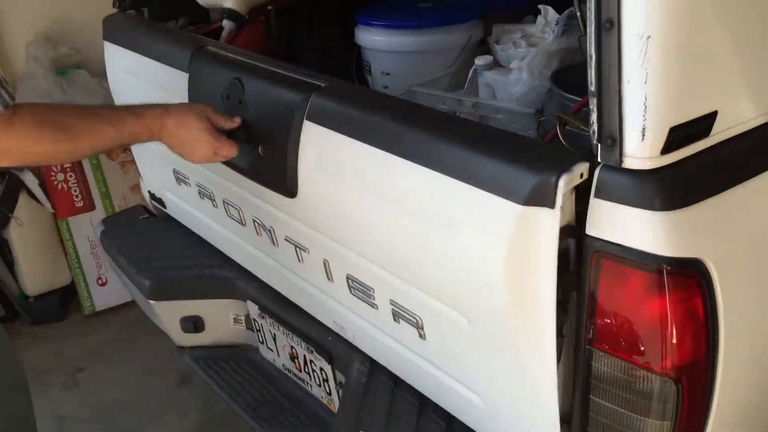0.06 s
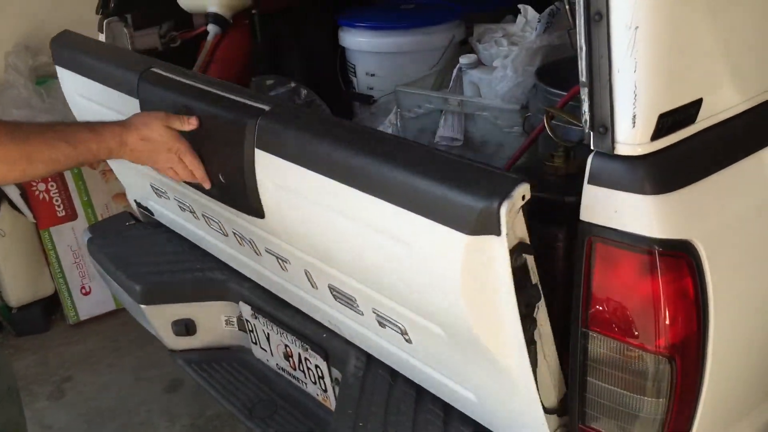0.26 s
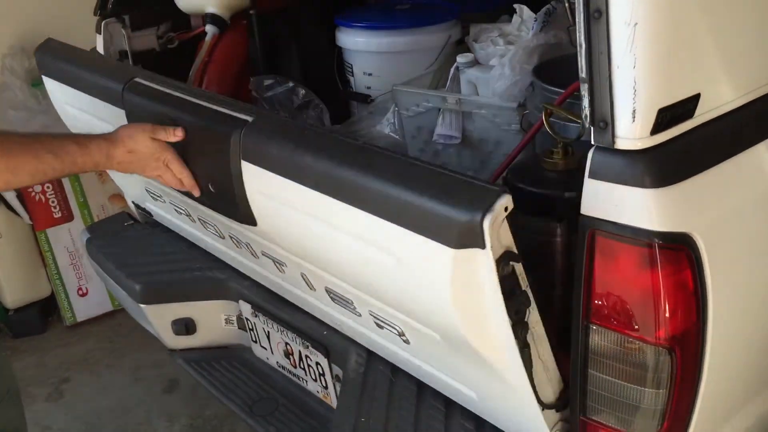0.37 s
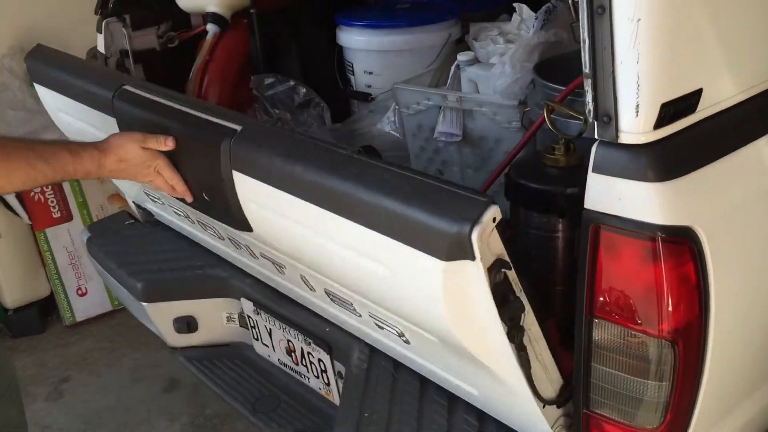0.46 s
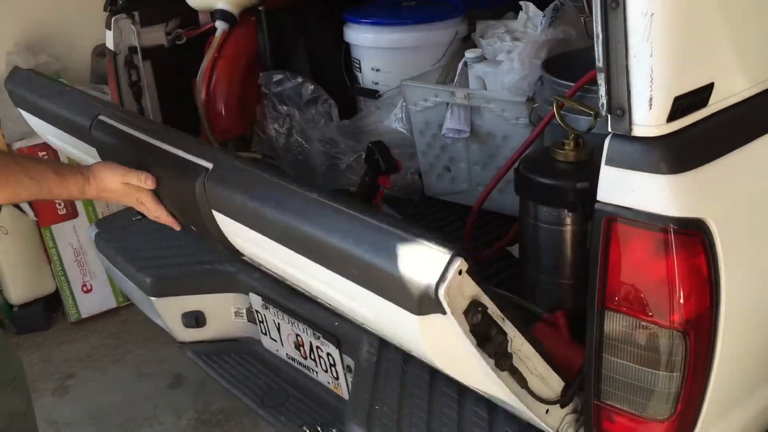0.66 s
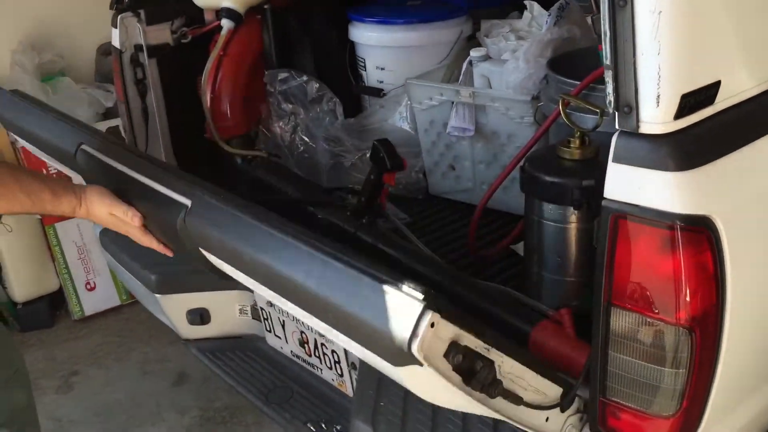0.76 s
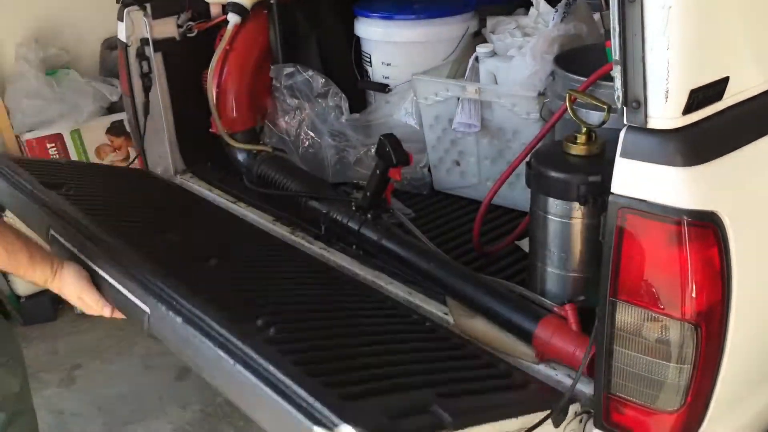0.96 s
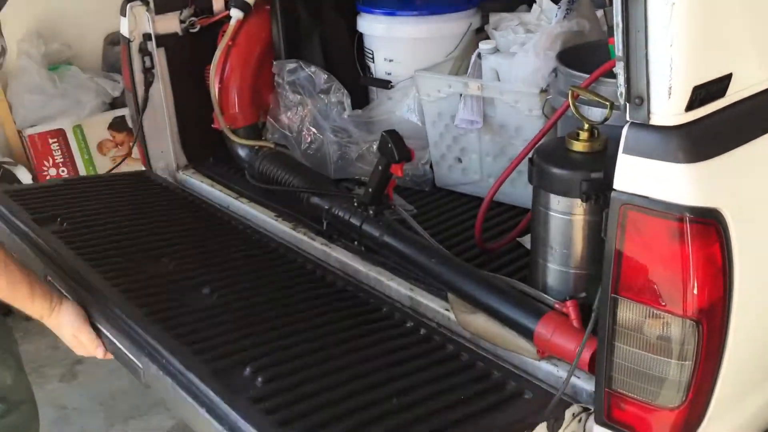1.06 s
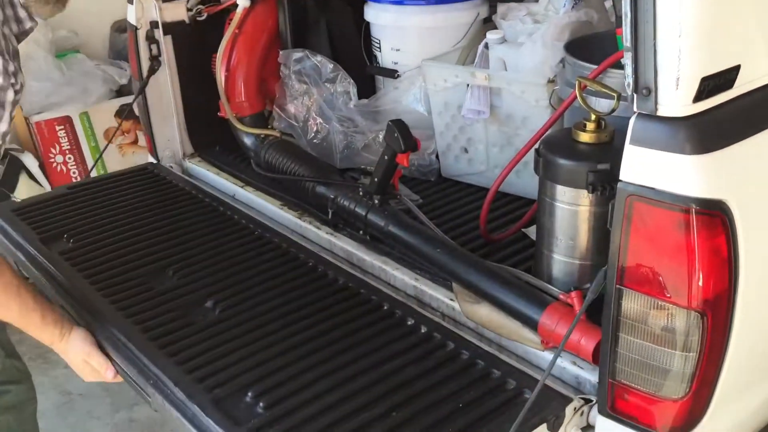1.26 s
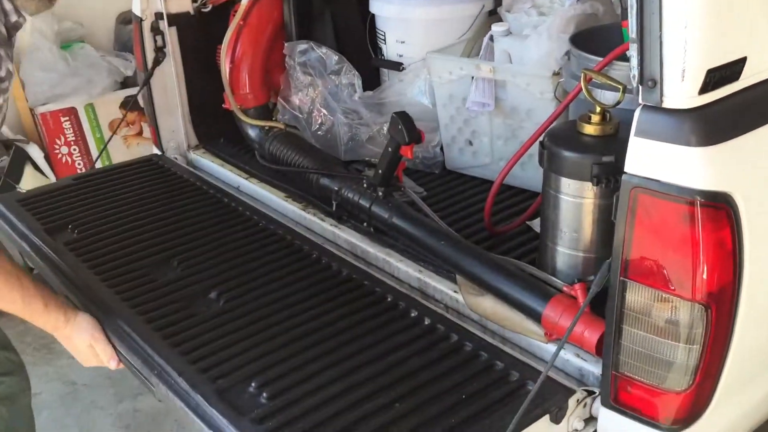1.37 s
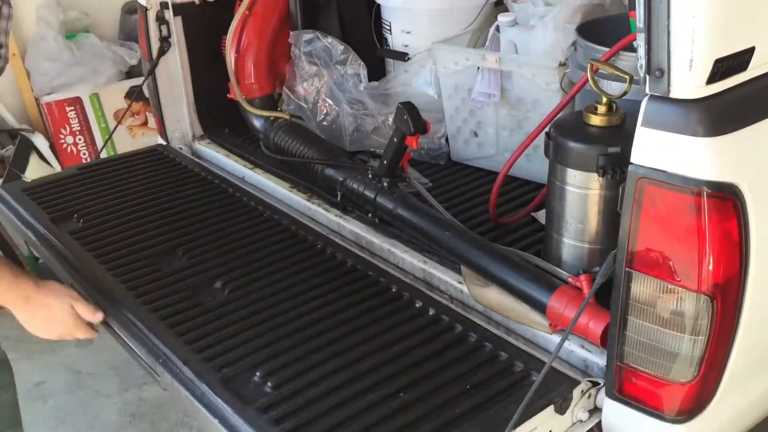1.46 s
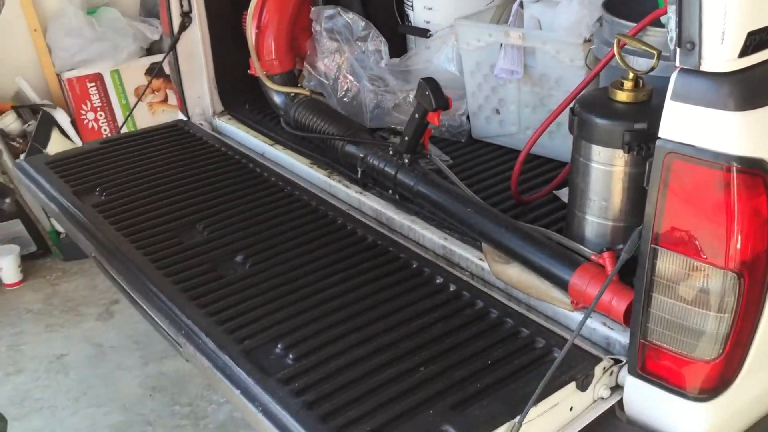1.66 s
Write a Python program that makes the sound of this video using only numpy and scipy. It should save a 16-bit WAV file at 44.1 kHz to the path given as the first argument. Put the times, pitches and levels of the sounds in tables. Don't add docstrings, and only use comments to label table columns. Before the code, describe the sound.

Truck tailgate being lowered in a reverberant garage; the steel latch snaps loudly, about a second later the gate lands with a boxy thud, loose parts rattle and cables tick, captured nearby by a small microphone.

```python
import sys
import numpy as np
from scipy import signal
from scipy.fft import rfft, irfft
from scipy.io import wavfile

SR = 44100
rng = np.random.default_rng(int(sys.argv[2]) if len(sys.argv) > 2 else 0)


def digitize_waveform(pressure):
    field = np.atleast_2d(pressure).T
    bounded = np.clip(field, -1, 1)
    quanta = np.round(bounded * 32767).astype(np.int16)
    wavfile.write(sys.argv[1], SR, quanta)


def elevation(decibels):
    levels = np.asarray(decibels, float)
    return 10 ** (levels / 20)


N = 74970
T = np.arange(N) / SR


# [t/s, peak level/dB, chatter t60/s, knock on the panel/dB]
LATCH_HITS = [(.146, -45.5, 0.0207, -54.5), (0.1515, -36, 0.047, -41.5), (.163, -46.5, 0.12, -35.5),
              (.173, -42, 0.048, -34), (0.191, -65, .05, -37), (.208, -57.5, 0.14, -26),
              (0.22, -36, 0.047, -44), (0.2246, -9.5, 0.051, -37), (.233, -39, .05, -30.5),
              (.243, -34, 0.02, -23.5), (0.258, -34, .05, -30.5), (0.28, -36, 0.023, -31),
              (0.301, -45, 0.091, -41.5), (.335, -50, 0.07, -55), (0.384, -57, 0.066, -49)]
# [f/Hz, level/dB per Hz]
LATCH_COLOUR = [(300, -13), (600, -10), (1150, -1), (2200, -11), (3200, -4.5), (4200, -7), (10000, -7),
                (15500, -24)]
# [f/Hz, level/dB, t60/s]
ROD_RINGS = [(891, -13.5, .05), (1315, -5.5, 0.013), (2840, -12.5, 0.093), (3150, -10.5, .03),
             (3298, -2, 0.011), (4242, -11.5, 0.09), (5000, -8, 0.027), (6660, -9, .02), (8560, -19, 0.032),
             (9640, -4.5, 0.0081)]


def latch():
    body_hz = 2020
    low_hz = 300
    s, db, t60, knock_db = np.transpose(LATCH_HITS)
    uneven = elevation(2.9 * drift(400))
    sharp = uneven * bursts(s, db, t60, rise_s=0.00023)
    swell = uneven * bursts(s, db + 6.5, t60, rise_s=0.0046)

    noise = tinted(LATCH_COLOUR)
    bright = above(noise, body_hz)
    dull = signal.sosfilt(signal.butter(4, body_hz, fs=SR, output="sos"), noise)
    crack = 0.59 * (sharp * bright + swell * dull)

    white = rng.standard_normal(N)
    rods = np.zeros(N)
    for hz, level_db, fall in ROD_RINGS:
        drive = white * (sharp if hz > body_hz else swell)
        rods += elevation(level_db - 7.5) * ring(drive, hz, fall) / np.sqrt(fall * SR / 28)

    knock = panel(s, knock_db, depth_db=4, soft_hz=1996)
    return above(crack, low_hz), above(rods, low_hz), above(knock, 240)


# [t/s, thud level/dB, tilt/dB per octave, rattle level/dB, rattle t60/s]
LANDINGS = [(1.124, -58, 13, -51, 0.22), (1.150, -38, 5, -63, .05), (1.176, -14.5, -0.5, -31, 0.11),
            (1.188, -24, -8, -34, 0.15), (1.198, -14, -1.5, -27, 0.063), (1.215, -19, 2, -41, 0.45),
            (1.24, -24, -4, -36, 0.037), (1.268, -24.5, 0, -56, 0.2), (1.28, -35.5, 11, -52, .1),
            (1.298, -32.5, 0, -51, 0.12), (1.323, -36.5, 9.5, -40, 0.043), (1.348, -36, -12.2, -49, .1),
            (1.378, -45.5, 10, -56.5, 0.11), (1.409, -48.5, 2, -51.5, 0.07), (1.46, -42.5, -5, -60.5, 0.15),
            (1.503, -58.5, -4.5, -71, 0.09)]
# [f/Hz, level/dB per Hz]
RATTLE_COLOUR = [(200, -2.5), (500, -7), (900, -3.5), (1500, -7.5), (3200, -13), (5000, -19), (10200, -23),
                 (15500, -32)]
# [t/s, peak level/dB, t60/s]
SMALL_TICKS = [
    (0.1532, -38.5, 0.022),
    (1.175, -36, 0.018),
    (1.197, -33, 0.065),
    (1.297, -39.5, 0.039),
    (1.395, -61.5, 0.079),
    (1.441, -57.5, 0.044),
    (1.611, -60.5, 0.083),
    (1.645, -62, 0.054),
]
# [f/Hz, level/dB per Hz]
TICK_COLOUR = [(3000, -36), (5500, -2.5), (8500, 1), (12500, -5.5), (15500, -11)]


def drop():
    low_hz = 100.8
    s, thud_db, depth_db, rattle_db, t60 = np.transpose(LANDINGS)
    shaking = bursts(s, rattle_db, t60, rise_s=0.0017) * elevation(1.5 * drift(315))
    rattle = shaking * tinted(RATTLE_COLOUR)
    ticks = bursts(*np.transpose(SMALL_TICKS), rise_s=0.0014) * tinted(TICK_COLOUR)
    thud = panel(s, thud_db, depth_db, soft_hz=860)

    since_dip = T - 1.28
    dip = elevation(-37) * np.exp(-(since_dip / 0.0083) ** 2) * np.sin(2 * np.pi * 28 * since_dip)
    return above(rattle, low_hz) + ticks, above(thud, low_hz), dip


# [f/Hz, level/dB, t60/s]
PANEL_MODES = [(136.1, -6, 0.31), (189, 2.5, 0.097), (218.6, -14.5, 0.28), (225, 0.5, 0.069),
               (257.3, -1.5, 0.2), (303.2, -2, 0.17), (367, -3, 0.078), (403.8, -9.5, 0.15),
               (427.2, -5, 0.13), (447.4, -3.5, 0.12), (533.1, -1, 0.075), (563.7, -5, 0.084),
               (632.7, -9, 0.055), (928, -9.5, 0.02)]


def panel(s, db, depth_db, soft_hz):
    out = np.zeros(N)
    luck_db = 1.94 * rng.normal(0, 1, (len(s), len(PANEL_MODES)))
    for k, (hz, level_db, t60) in enumerate(PANEL_MODES):
        push_db = db + level_db - 8.5 + depth_db * np.log2(hz / 280) + luck_db[:, k]
        push = np.zeros(N)
        push[(s * SR).astype(int)] = elevation(push_db) * (-1) ** k
        out += ring(push, hz, t60)
    r = np.exp(-2 * np.pi * soft_hz / SR)
    return signal.lfilter([(1 - r) ** 2], [1, -2 * r, r * r], out)


# [f/Hz, t60/s]
GARAGE_T60 = [(100, 0.47), (300, 0.37), (1000, 0.43), (3000, .45), (7000, 0.28), (14000, 0.12)]


def garage(x):
    t = T[:SR]
    echo = np.zeros(SR)
    for hz, band in bands(rng.standard_normal((2, SR))):
        t60 = at_hz(GARAGE_T60, hz)
        echo += band * elevation(-60 * t / t60) / np.sqrt(t60)
    echo *= 1 - np.exp(-(t / 0.006) ** 2)
    return signal.fftconvolve(x, echo / np.sqrt(SR / 14))[:N]


# [t/s, level/dB]
RUSTLE_LEVEL = [(0, -73.5), (.3, -75.5), (.6, -76.5), (.8, -77), (.88, -67.5), (1.0, -65), (1.12, -63),
                (1.3, -75), (1.5, -76), (1.6, -66), (1.66, -71.5), (1.7, -73)]
# [f/Hz, level/dB per Hz]
RUSTLE_COLOUR = [(1470, -39), (2500, -17.5), (3580, -5), (4820, -7.5), (5620, -4), (10700, 1.5),
                 (15500, -11)]


def rustle():
    level_db = np.interp(T, *np.transpose(RUSTLE_LEVEL)) + 1.0 + 1.2 * drift(30)
    return elevation(level_db) * tinted(RUSTLE_COLOUR)


# [f/Hz, level/dB per Hz]
AIR_COLOUR = [(30, -46), (75, -10), (200, -4.5), (400, -9.5), (1000, -13.5), (2000, -21), (5000, -29),
              (15500, -29)]
# [t/s, level/dB]
AIR_LOUDNESS = [(0, -59), (.08, -62.5), (.7, -63.5), (.82, -60.5), (1.1, -62), (1.7, -62)]


def room_air():
    level_db = np.interp(T, *np.transpose(AIR_LOUDNESS)) + 1.2 * drift(2.8)
    return elevation(level_db) * tinted(AIR_COLOUR)


def bursts(s, db, t60, rise_s):
    power = np.zeros(N)
    for at, level_db, fall in zip(s, db, t60):
        age = np.maximum(T - at, 0)
        power += elevation(2 * (level_db - 60 * age / fall)) * (1 - np.exp(-age / rise_s)) ** 2
    return np.sqrt(power)


def ring(x, hz, t60):
    r = elevation(-60 / (t60 * SR))
    w = 2 * np.pi * hz / SR
    return signal.lfilter([0, np.sin(w)], [1, -2 * r * np.cos(w), r * r], x + 1e-18)


def tinted(tone):
    hz = np.maximum(np.fft.rfftfreq(N, 1 / SR), 5)
    skirt_db = -18 * np.maximum(np.log2(tone[0][0] / hz), 0)
    spectrum = rfft(rng.standard_normal(N)) * elevation(at_hz(tone, hz) + skirt_db)
    return rms_one(irfft(spectrum, N))


def drift(rate):
    r = np.exp(-2 * np.pi * rate / SR)
    return rms_one(signal.lfilter([1], [1, -2 * r, r * r], rng.standard_normal(N + SR))[SR:])


def bands(white):
    edges = 22 * 2 ** np.arange(0, 9.6, .5)
    for k, (low, high) in enumerate(zip(edges, edges[1:])):
        band_pass = signal.butter(2, [low, high], "band", fs=SR, output="sos")
        yield np.sqrt(low * high), signal.sosfilt(band_pass, white[k % 2])


def above(x, hz):
    return signal.sosfilt(signal.butter(4, hz, "high", fs=SR, output="sos"), x)


def at_hz(points, hz):
    table_hz, value = np.transpose(points)
    return np.interp(np.log(hz), np.log(table_hz), value)


def rms_one(x):
    return x / np.sqrt(np.mean(x ** 2) + 1e-20)


def scene():
    crack, rods, knock = latch()
    rattle, thud, dip = drop()
    hard = crack + rattle
    hollow = knock + thud
    sent = elevation(-5) * hard + elevation(-14) * rods + elevation(-0.5) * hollow
    return (hard + rods + hollow + dip + garage(sent) + rustle() + room_air())[None]


def top_cut(x):
    return signal.sosfilt(signal.butter(12, 16380, fs=SR, output="sos"), x)


def record(dry):
    top_step = signal.ellip(6, .5, 27, 15300, fs=SR, output="sos")
    thin_bass = signal.butter(1, 60.3, "high", fs=SR, output="sos")
    mix = signal.sosfilt(thin_bass, signal.sosfilt(top_step, dry))
    return top_cut(mix)


dry = scene()
out = record(dry)
digitize_waveform(out)
```